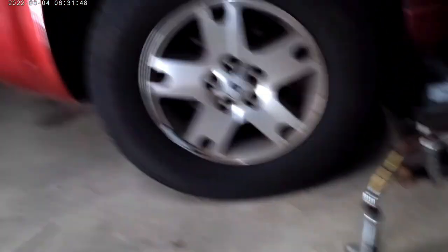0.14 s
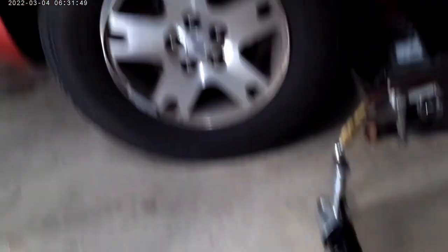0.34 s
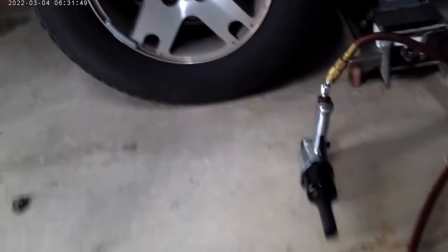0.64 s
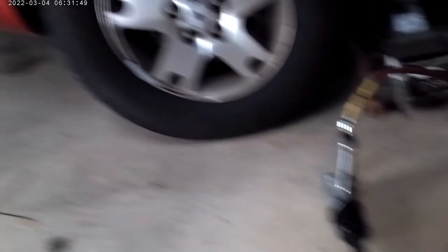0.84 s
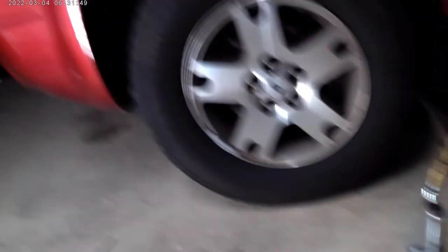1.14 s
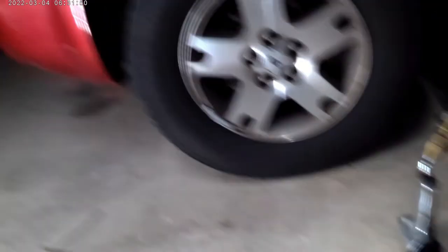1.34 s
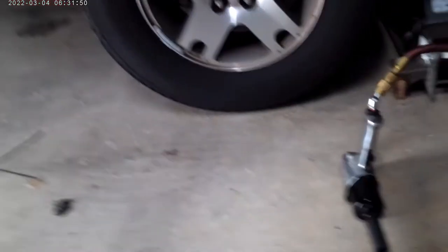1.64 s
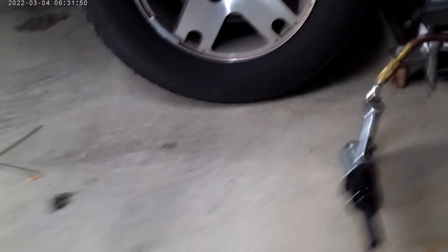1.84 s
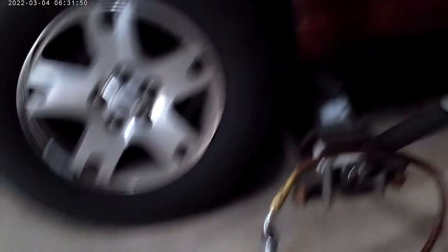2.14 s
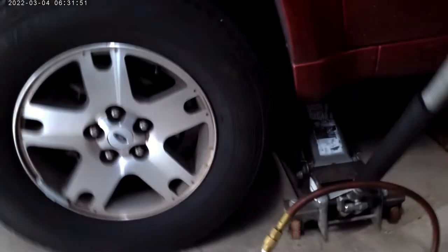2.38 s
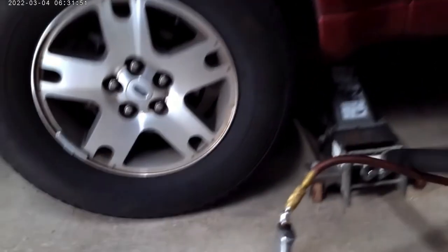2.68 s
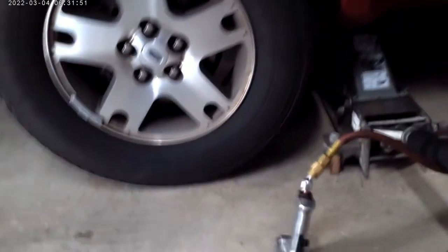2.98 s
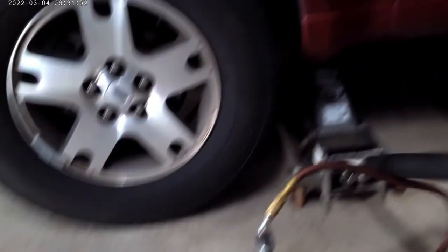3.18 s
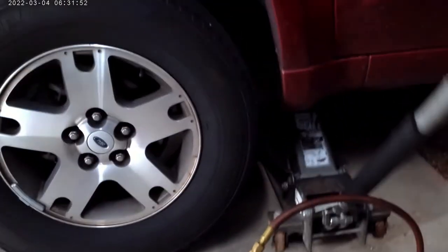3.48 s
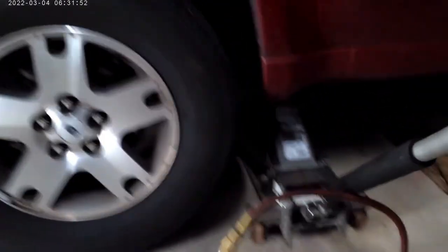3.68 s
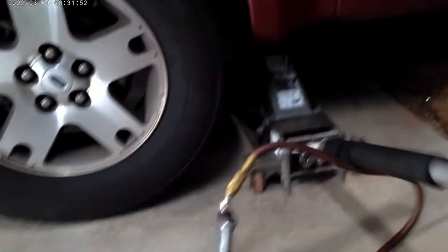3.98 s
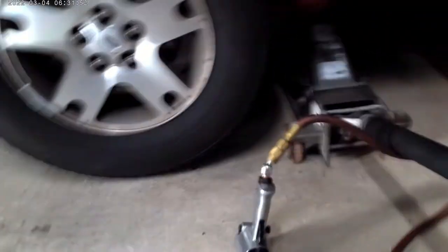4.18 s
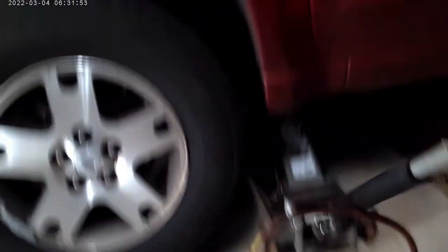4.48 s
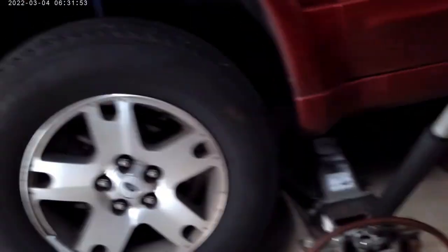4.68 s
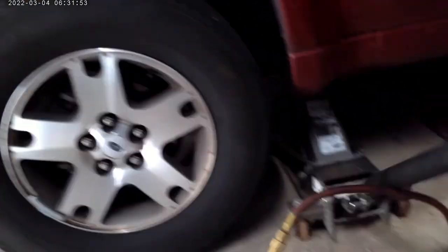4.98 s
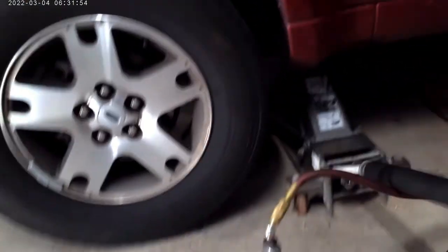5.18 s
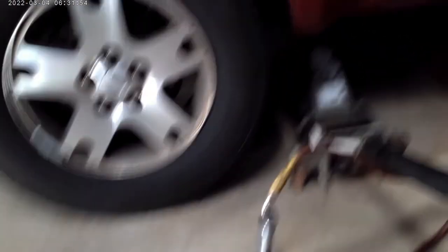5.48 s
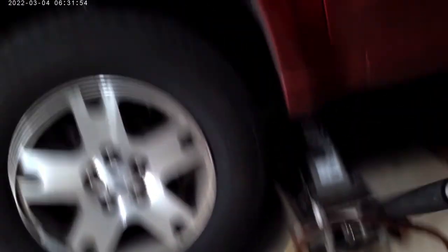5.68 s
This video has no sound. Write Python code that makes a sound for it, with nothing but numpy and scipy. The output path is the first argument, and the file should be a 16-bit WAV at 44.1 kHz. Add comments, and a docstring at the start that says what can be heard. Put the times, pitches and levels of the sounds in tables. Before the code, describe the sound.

Close by in a garage, a hydraulic jack is worked by hand under a car. Brief muffled valve rattles come about once a second among dry scrapes, thin squeaks and ticks. Then the steel linkage cracks in a loud stuttering creak, and after a pause again with a clank and dull thump. Faint hiss and low drone lie beneath; a phone microphone clips the loudest snaps.

```python
"""A pump valve chatters briefly once a stroke as a hydraulic floor jack is pumped by hand under a car in a garage.
The dry pivot scrapes, squeaks and ticks; then the load shifts and the steel linkage creaks in two loud runs of
slips, the second with a clank. Valve, linkage and clank are impulses ringing modes and scattering under the car; the
pivot is sparse filtered catches and band-passed noise. Short narrow-band tones, one a ringing clink, and dull body
thumps join in; faint hiss, rumble and a low drone lie underneath."""
import sys
import numpy as np
from scipy import signal
from scipy.fft import rfft, irfft
from scipy.io import wavfile
from scipy.ndimage import uniform_filter1d

SR = 44100
rng = np.random.default_rng(int(sys.argv[2]) if len(sys.argv) > 2 else 0)


def transcribe(u):
    """Save the signal u as a 16-bit wav file named by the first command-line argument.

    u: samples, shape (n,) or (channels, n), limited to [-1, 1]; the rate is SR.
    q: integer samples, one column per channel.
    """
    v = np.clip(np.atleast_2d(u).T, -1, 1)
    q = np.round(v * 32767).astype(np.int16)
    wavfile.write(sys.argv[1], SR, q)


N = 257103
T = np.arange(N) / SR
RING_T = T[:SR // 2]  # time since a blow, s
ROOM_T60_S = 0.14

# Jack arm modes. Each row: nominal frequency in Hz, mean level in dB, T60 in s.
ARM_MODES = [(2197, 10, 0.086), (2170, -12.5, 0.22), (2550, 18.5, 0.086), (2840, -7, 0.13),
             (2870, -4, 0.22), (2730, -11.5, 0.068), (2860, -31, .2), (3430, 10, 0.17), (3260, 2, 0.053)]
# Jack frame modes. Each row: nominal frequency in Hz, mean level in dB, T60 in s.
FRAME_MODES = [(421, -27, 0.32), (530.3, 0.5, 0.093), (541, -8.5, 0.056), (583.5, 3.5, 0.052),
               (675, -6.5, 0.12), (958, -15.5, 0.18), (1027, -9, 0.074)]
# Spectrum of the scattered snap. Each row: frequency in Hz, relative level in dB.
SNAP_SPECTRUM = [(200, -34), (700, -23.5), (1400, -18.5), (1800, -11.5), (2300, -1), (2900, -5.5),
                 (3500, -12), (4800, -14), (8000, -58), (11000, -54)]
# Spectrum of the bright edge of a slip. Each row: frequency in Hz, relative level in dB.
EDGE_SPECTRUM = [(2500, -13.5), (4300, -1), (6000, 7.5), (8200, 2.5), (10000, -6.5), (11500, -28)]


def linkage(snap_db=3, hardening=0.37, scatter_db=-13, arm_db=-17, frame_db=-3, edge_db=-3, tick_db=4,
            edge_t60_s=0.1, ripple_db=3.0, edge_ripple_db=6, swell_s=0.0015):
    """Each slip is a snap that rings the arm and frame and scatters under the car; light slips are rounder."""
    out = np.zeros(N)
    edge = colour(EDGE_SPECTRUM)
    tick = edge / np.abs(edge).max()
    swell = 1 - np.exp(-(RING_T / swell_s) ** 2)  # the heavy parts take a few ms to start ringing
    for start_s, level_db, ring_db, bright_db in slips():
        add(out, start_s, undb(level_db * (1.5 + hardening) + snap_db) * snap())
        add(out, start_s + 0.001072, undb(bright_db + tick_db) * tick)

        snap_tail = through(scatter(ROOM_T60_S), colour(SNAP_SPECTRUM, ripple_db))
        add(out, start_s, undb(level_db + scatter_db) * snap_tail)
        edge_tail = through(scatter(edge_t60_s), colour(EDGE_SPECTRUM, edge_ripple_db))
        add(out, start_s, undb(bright_db + edge_db) * edge_tail)

        arm = undb(level_db + arm_db) * ring(ARM_MODES)
        frame = undb(ring_db + frame_db) * ring(FRAME_MODES)
        add(out, start_s, swell * (arm + frame))
    return out


# Creaks of the loaded linkage, each a run around its strongest slip. Each row: time of the strongest slip in s,
# slips before and slips after (rounded, negative means none), mean gap in s, then that slip's snap, frame ring
# and bright edge in dB before the linkage's trims.
CREAKS = [(2.6102, 0, 1, .007, -13, -32.5, -44), (2.6314, 0, 0, .01, -16, -28.5, -53),
          (2.7413, 0, 1, .007, -18, -26.5, -36), (2.9648, 0.5, -1, .01, -30.5, -57, -66),
          (3.2627, 0, 0.5, .01, -26, -54, -60), (3.8124, 1, 1, .011, -7, -15, -23.5),
          (3.915, 4, 1, 0.0098, -4.5, -12.5, -23.5), (3.9682, 1, 0, 0.011, -1, -24, -23.5),
          (3.9815, 0, 0, .01, -2, -21, -19), (3.9977, 0, 3, 0.011, -0.5, -14.5, -27),
          (4.0745, 0.5, 0, .01, -17, -31, -46), (4.0932, 0, -0.5, .01, -13, -24, -29),
          (4.131, 0, 0, .01, -8, -57, -25.5), (5.02, 0, 1, .011, -18.5, -31.5, -34.5),
          (5.0612, 0, 0, .01, -19, -31, -32), (5.0827, 0, 1, .006, -10.5, -25, -27),
          (5.1101, 0, 0, .01, -10.5, -27, -27.5), (5.1268, 0, 0, .01, -3.5, -22, -9),
          (5.1837, 2, 0, .011, -4, -13, -16.5), (5.2121, 0, 0, .01, -8.5, -20.5, -28),
          (5.236, 0, 2, .008, -6, -14, -24)]
BUILD_DB_PER_SLIP, DIE_DB_PER_SLIP = 2, 2.4
LESSER_DB = -2.5  # extra step from the strongest slip to all others
GAP_SPREAD = 0.13  # timing scatter as a share of the gap


def slips():
    """Stick and slip: slips come at uneven gaps, grow up to the strongest and then die away."""
    for start_s, before, after, gap_s, *levels_db in CREAKS:
        yield start_s, *levels_db
        for k in [*range(-round(before), 0), *range(1, round(after) + 1)]:
            offset_s = gap_s * (k + GAP_SPREAD * rng.standard_normal())
            step_db = BUILD_DB_PER_SLIP if k < 0 else DIE_DB_PER_SLIP
            weaker_db = LESSER_DB - abs(k) * step_db
            yield start_s + offset_s, *(np.array(levels_db) + weaker_db)


def snap(hz=2700, width_s=0.00049, lag_s=0.00091):
    """A burst of about three cycles, pitched a little differently at each slip."""
    pitch = 1 + 0.028 * rng.standard_normal()
    phase = rng.uniform(0, 2 * np.pi)
    envelope = np.exp(-((RING_T - lag_s) / width_s) ** 2 / 2)
    return envelope * np.sin(2 * np.pi * hz * pitch * RING_T + phase)


# Blows of the handle socket on the frame. Each row: start in s, level in dB before the clank's trims.
CLANKS = [(5.122, -18.5), (5.127, -16), (5.133, -9), (5.139, -8), (5.162, -37), (5.184, -21.5),
          (5.235, -21), (5.433, -47.5)]
# Socket modes. Each row: nominal frequency in Hz, mean level in dB, T60 in s.
SOCKET_MODES = [(551, 5, 0.091), (1030, 5, 0.15), (1112, 3.5, 0.14), (1660, -3, 0.1), (2960, 5.5, 0.18),
                (3396, 12, 0.12), (3840, -13.5, 0.17), (4210, 16, 0.08), (4290, 3, 0.3), (6300, -1, 0.29)]
# Spectrum of the crash. Each row: frequency in Hz, relative level in dB.
CLANK_SPECTRUM = [(59, -32), (100, -22), (398, -20), (888, -1.5), (1040, -4.5), (1330, -10), (1410, -33),
                  (1650, 1), (2420, -29), (4070, 2), (5170, -14), (8200, -17.5), (12000, -69), (15600, -79),
                  (22000, -120)]


def clank(modes_db=-5, crash_db=-1, t60_s=0.13, ripple_db=3):
    """The socket strikes the frame and bounces: each blow rings modes and a crash of filtered noise."""
    out = np.zeros(N)
    body = colour(CLANK_SPECTRUM, ripple_db)
    for start_s, level_db in CLANKS:
        crash = through(scatter(t60_s), body)
        add(out, start_s, undb(level_db) * (undb(modes_db) * ring(SOCKET_MODES) + undb(crash_db) * crash))
    return out


# Valve chatter. Each row: start in s, rms level over the first 1/32 s in dB, centre in Hz, length in s.
VALVE_CHATTER = [(0.085, -28.5, 1440, 0.018), (1.249, -24.5, 1770, 0.014), (2.356, -19.5, 2380, 0.023),
                 (3.259, -39.5, 2630, 0.015), (3.47, -26, 2050, 0.021), (4.76, -33, 1800, 0.023)]
# Spectrum of the valve body. Each row: frequency in Hz, relative level in dB.
VALVE_SPECTRUM = [(200, -58), (550, 2.5), (720, 4), (900, 5.5), (1080, -16), (1380, 6), (1800, -5),
                  (2250, 1), (2650, -11), (3200, -29), (4200, -21.5), (7000, -30.5)]
# Pump body modes. Each row: nominal frequency in Hz, mean level in dB, T60 in s.
PUMP_MODES = [(700, -20, 0.13), (880, 6.5, 0.034), (1168, 19.5, 0.02), (1340, -12, 0.082),
              (1502, -22, 0.095), (1614, -20, 0.11), (1737, 4, 0.097), (2080, 2, 0.077), (2258, -1, 0.097),
              (3290, -4, 0.039)]


def valve(rate_hz=230, width_hz=1250, wet_db=-29, t60_s=0.14, modes_db=-21, swell_s=0.012):
    """The valve ball rattles on its seat for a few beats, muffled by the oil, and rings the pump body."""
    out = np.zeros(N)
    for start_s, level_db, hz, length_s in VALVE_CHATTER:
        chance = rng.standard_normal((24, 2))
        gaps_s = np.exp(.3 * chance[:, 0]) / rate_hz
        times_s = np.cumsum(gaps_s) - gaps_s[0]
        envelope = np.exp(-(times_s / length_s) ** 2) * (1 - np.exp(-(times_s + 0.0022) / swell_s))
        beats = np.zeros(len(RING_T))
        beats[(times_s * SR).astype(int)] = undb(2.5 * chance[:, 1]) * envelope

        reflected = beats + undb(wet_db) * through(beats, scatter(t60_s))
        knocks = through(reflected, colour(VALVE_SPECTRUM))
        knocks = knocks + undb(modes_db) * through(beats, ring(PUMP_MODES))
        rattle = resonate(knocks, hz, width_hz)
        rattle = resonate(rattle, 1610, 4600)  # oil rounds each beat
        add(out, start_s, undb(level_db) * rattle / np.std(rattle[:SR // 32]))
    return out


# Rubs as the handle moves, and two sharp ticks at 1.844 and 5.435 s. Each row: peak time in s, swell time in s,
# scrape and squeal in dB before trims.
RUBS_AND_TICKS = [(0.42, 0.13, -46, -45), (0.73, .025, -36.5, -78), (1.26, 0.18, -39.5, -80),
                  (1.42, .04, -46, -52.5), (1.524, .013, -61, -39.5), (1.62, 0.041, -38, -44.5),
                  (1.684, 0.021, -33.5, -46), (1.844, .013, -29.5, -45), (2.62, .12, -43, -48.5),
                  (3.62, 0.021, -58, -50), (3.81, 0.021, -31, -60), (3.96, 0.09, -33, -57),
                  (4.42, 0.021, -58, -56), (5.13, 0.084, -30, -46), (5.435, .01, -38, -51),
                  (5.81, 0.079, -49.5, -78)]
# Light scrape of the handle between them, interpolated. Each row: time in s, level in dB before the scrape trim.
DRAG = [(0, -47.5), (1.9, -50.5), (2.2, -56), (5.8, -55)]
# Spectrum of the scrape. Each row: frequency in Hz, relative level in dB.
SCRAPE_SPECTRUM = [(200, -3), (700, -2.5), (1400, 2.5), (2100, 0.5), (2750, -0.5), (3300, -2), (5200, -7),
                   (7000, -22), (10000, -27.5)]
# Squeal resonances. Each row: frequency in Hz, width of the first band-pass in Hz, mean relative level in dB.
SQUEAL_MODES = [(2730, 290, -4), (4230, 470, 8), (7470, 230, 9.5), (8150, 110, 5), (8480, 78, 1.5)]


def pivot(scrape_db=-1, squeal_db=0, grain_db=8, wet_db=-25):
    """Rubs and two ticks: tiny uneven catches of dry steel in shifting colour, with a thin squeal on top."""
    peak_s, swell_s, scrape, squeal = np.transpose(RUBS_AND_TICKS)
    caught = rng.random(N) < 900 / SR  # about 900 catches per second
    catches = rng.standard_normal(N) * caught * undb(grain_db * rng.random(N))
    catches = catches + undb(wet_db) * through(catches, scatter(ROOM_T60_S))
    grit = patchy(through(catches, colour(SCRAPE_SPECTRUM)), depth_db=5.5)
    whistle = patchy(hopping(rng.standard_normal(N), SQUEAL_MODES), depth_db=7.5)

    drag = undb(np.interp(T, *np.transpose(DRAG)))
    scraping = np.sqrt(swells(peak_s, swell_s, scrape, release=1.15, roundness=1.14) + drag ** 2)
    squealing = np.sqrt(swells(peak_s, swell_s, squeal, release=1.05, roundness=1.4))
    return grit * scraping * undb(scrape_db) + whistle * squealing * undb(squeal_db)


def hopping(x, modes):
    """Resonances whose levels wander independently as the contact point moves."""
    total = 0
    for hz, width_hz, level_db in modes:
        tone = resonate(resonate(x, hz, width_hz), hz, width_hz * 2)
        total = total + undb(level_db + 2 * walk(21.02)) * unit(tone)
    return unit(total)


# Short narrow-band tones: pivot squeaks and one ringing clink at 3.277 s.
# Each row: peak time in s, level in dB, frequency in Hz.
SHORT_TONES = [(0.393, -36.5, 2720), (0.437, -37.5, 2900), (0.5, -44, 2740), (0.558, -40, 2730),
               (2.55, -42.5, 2700), (3.277, -33, 2414)]


def short_tones(width_hz=160, length_s=0.0097):
    """Pivot squeaks and one ringing clink: narrow-band noise under a short bell envelope."""
    out = np.zeros(N)
    for peak_s, level_db, hz in SHORT_TONES:
        swell = np.exp(-((T - peak_s) / length_s) ** 2 / 2)
        tone = swell * resonate(resonate(rng.standard_normal(N), hz, width_hz), hz, width_hz * 2)
        out += undb(level_db) * tone * np.linalg.norm(swell) / np.linalg.norm(tone)
    return out


# Dull thumps of the car body. Each row: start in s, rms level over the first 1/25 s in dB, frequency in Hz.
THUMPS = [(2.61, -51.5, 90), (2.615, -41.5, 186), (2.65, -45, 204), (3.269, -49, 160), (3.99, -45.5, 200),
          (4.55, -51, 296), (5.129, -34, 194), (5.134, -40, 55.6), (5.791, -50, 350)]


def car_body(t60_s=0.2):
    """The car's panels and springs answer with short dull thumps: decaying noise, band-passed twice."""
    out = np.zeros(N)
    for start_s, level_db, hz in THUMPS:
        thump = resonate(resonate(scatter(t60_s), hz, hz * 0.57), hz, hz * 0.57)
        add(out, start_s, undb(level_db) * thump / np.std(thump[:SR // 25]))
    return out


# Spectrum of the hiss. Each row: frequency in Hz, relative level in dB.
AIR_SPECTRUM = [(24, -29), (40, -31), (81, -1.5), (127, -15), (198, -5.5), (364, -5), (472, -4), (720, -5),
                (2440, -8.5), (3020, -4), (11000, -31.5), (14300, -87), (22000, -120)]
# Swells of the low drone. Each row: peak time in s, swell time in s, level in dB before the drone trim.
DRONE_SWELLS = [(0.5, 0.29, -50.5), (1.15, .2, -43), (4.33, 0.15, -41), (5.13, 0.055, -42)]
DRONE_HZ, DRONE_WIDTH_HZ = 88.9, 21.7
DRONE_REST_DB = -64.5  # before the drone trim
AIR_DB = -49  # mean, before flicker


def garage(drone_db=-4, flicker_db=1.8, rumble_db=-64):
    """A faintly flickering hiss, an uneven rumble and a low wavering drone, all filtered noise."""
    hiss = patchy(through(rng.standard_normal(N), colour(AIR_SPECTRUM, size=4096)), depth_db=4.0)
    air = hiss * undb(AIR_DB + flicker_db * walk(7))

    low_noise = resonate(resonate(rng.standard_normal(N), 150, 280), 150, 400)
    rumble = patchy(low_noise, depth_db=10.5) * undb(rumble_db + 2 * walk(8.1))

    drone = resonate(rng.standard_normal(N), DRONE_HZ, DRONE_WIDTH_HZ)
    drone = unit(resonate(drone, DRONE_HZ, DRONE_WIDTH_HZ * 2))
    power = undb(DRONE_REST_DB) ** 2 + swells(*np.transpose(DRONE_SWELLS), release=0.78, roundness=0.95)
    return air + rumble + drone * np.sqrt(power) * undb(drone_db)


def undb(db):
    """Decibels to gain."""
    return 10 ** (np.asarray(db) / 20)


def unit(x):
    """Scale to rms 1."""
    return x / np.sqrt(np.mean(x ** 2))


def fade(t60_s):
    """Exponential decay, 60 dB down at t60_s."""
    return np.exp(-np.log(1000) * RING_T / t60_s)


def through(x, response):
    """Convolve, keeping the length."""
    return signal.fftconvolve(x, response)[:len(x)]


def add(track, start_s, sound):
    """Mix a sound in at start_s."""
    i = max(int(start_s * SR), 0)
    track[i:i + len(sound)] += sound[:N - i]


def ring(modes):
    """Decaying modes, nominally rms 1 at the start; every blow meets them at another place."""
    hz, db, t60_s = np.transpose(modes)
    chance = rng.standard_normal((len(hz), 2))
    gain = undb(db + 5.0 * chance[:, 0])
    detuned_hz = hz * (1 + 0.0066 * chance[:, 1])
    signed_gain = gain * rng.choice([-1, 1], len(hz))
    waves = [g * fade(t60) * np.sin(2 * np.pi * f * RING_T)
             for f, g, t60 in zip(detuned_hz, signed_gain, t60_s)]
    return sum(waves) / np.sqrt(np.sum(gain ** 2) / 2)


def scatter(t60_s):
    """Dense short reflections between the floor and the underside of the car."""
    return rng.standard_normal(len(RING_T)) * fade(t60_s) * (1 - np.exp(-RING_T / 0.00061))


def colour(points, ripple_db=0, size=2048):
    """Causal unit-energy response of a (Hz, dB) spectrum; ripple adds random unevenness across frequency, in dB."""
    hz, db = np.transpose(points)
    f = np.maximum(np.arange(size // 2 + 1) * SR / size, 1)
    ripple = ripple_db * np.interp(f, np.linspace(0, SR / 2, 240), rng.standard_normal(240))
    magnitude = undb(np.interp(np.log(f), np.log(hz), db) + ripple)
    # Fold the cepstrum for minimum phase.
    cepstrum = irfft(np.log(magnitude))
    cepstrum[1:size // 2] *= 2
    cepstrum[size // 2 + 1:] = 0
    response = irfft(np.exp(rfft(cepstrum)))
    return response / np.linalg.norm(response)


def resonate(x, hz, width_hz):
    """Two-pole band-pass."""
    return signal.lfilter(*signal.iirpeak(hz, hz / width_hz, fs=SR), x)


def low_pass(x, hz):
    """Steep elliptic low-pass."""
    return signal.sosfilt(signal.ellip(8, .2, 75, hz, fs=SR, output="sos"), x)


def walk(rate_hz):
    """Slow random wander of rms 1 through rate_hz knots per second."""
    knots = rng.standard_normal(2048)
    return unit(np.interp(T * rate_hz, np.arange(len(knots)), knots))


def patchy(x, depth_db, size=1024):
    """Narrow bands swell and fade for a few hundredths of a second each."""
    spectra = signal.stft(x, nperseg=size)[2]
    wander = uniform_filter1d(rng.standard_normal(spectra.shape), size=3, axis=0)  # across frequency
    wander = uniform_filter1d(wander, size=6, axis=1)  # across time
    return unit(signal.istft(spectra * undb(depth_db * unit(wander)), nperseg=size)[1][:N])


def swells(peaks_s, lengths_s, levels_db, release, roundness):
    """Summed power of sounds that swell to a peak and fade; release is the fade's share of the swell time."""
    power = 0
    for peak_s, length_s, level_db in zip(peaks_s, lengths_s, levels_db):
        distance = np.maximum(peak_s - T, (T - peak_s) / release) / length_s
        power = power + undb(level_db) ** 2 * np.exp(-2 * distance ** roundness)
    return power


def scene():
    """All sources at one microphone, a step or two away."""
    return (linkage() + clank() + valve() + pivot() + short_tones() + car_body() + garage())[None]


MIC_TOP_HZ, TOP_HZ = 11100, 15700


def record(dry):
    """The phone's microphone hears a limited band, clips the loudest snaps and cuts the top."""
    clipped = np.clip(low_pass(dry, MIC_TOP_HZ), -.92, .92)
    return low_pass(clipped, TOP_HZ)


dry = scene()
out = record(dry)
transcribe(out)
```